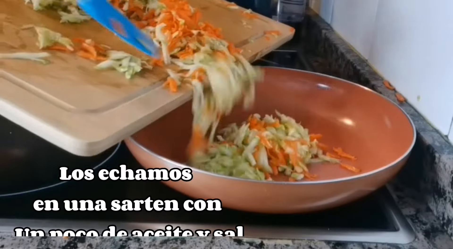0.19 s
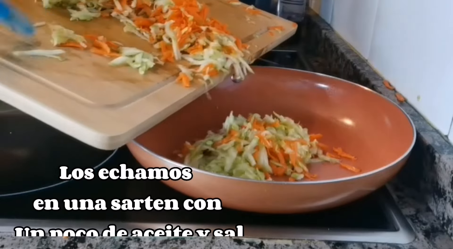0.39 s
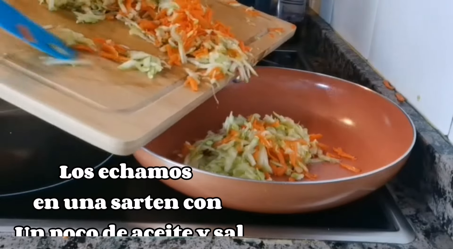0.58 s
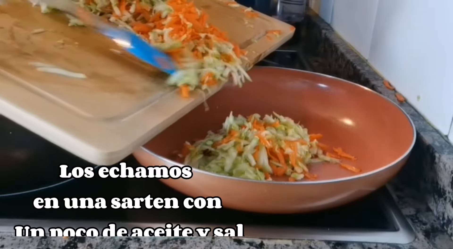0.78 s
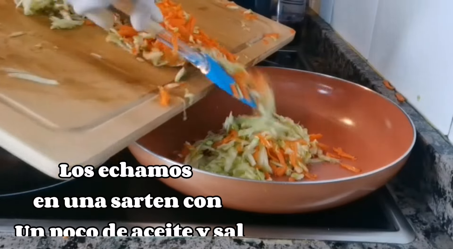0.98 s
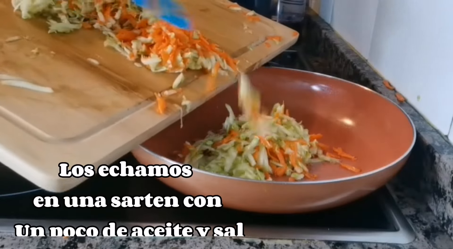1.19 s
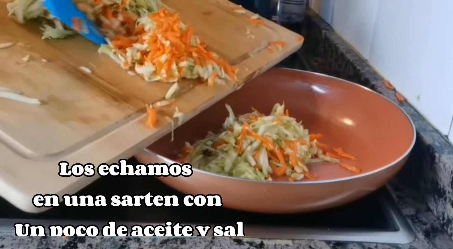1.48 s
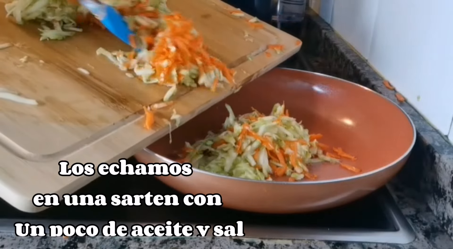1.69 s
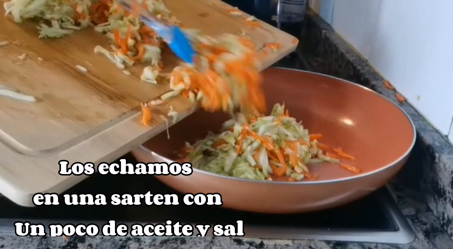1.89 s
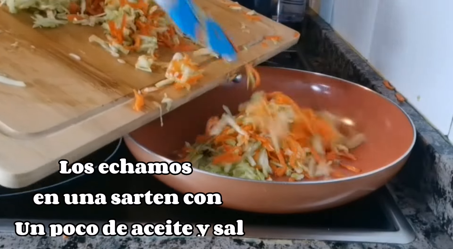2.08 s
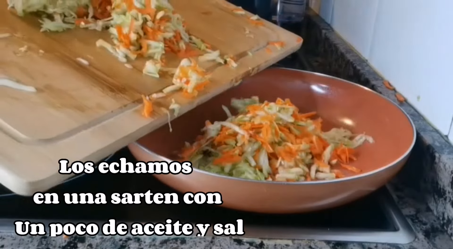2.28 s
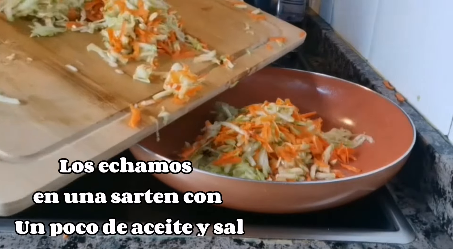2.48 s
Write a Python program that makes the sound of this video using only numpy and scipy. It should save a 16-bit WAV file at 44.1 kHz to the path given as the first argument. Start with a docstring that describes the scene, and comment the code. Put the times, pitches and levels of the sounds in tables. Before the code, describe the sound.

A hard clack dominates at 0.25 s, after faint wet scraping, ticks and dull bumps: a bright crack, rattling ring and swelling low boom, dying within half a second. Gritty, hissing scrapes of shreds on wood peak around 0.8 s, with a tick near 0.9. From 1.58 to 1.65 s woody bumps and dry raps cluster; lighter knocks, a click at 1.9, scrapes and soft taps follow. Low mains hum, close kitchen echoes.

```python
"""A silicone spatula pushes shredded vegetables off a wooden board into a frying pan.
First a wet scrape (grainy noise), dull bumps of the board (ringing modes) and ticks of shreds (short noise).
Then one hard clack rings through the kitchen: bright noise, with ringing tones that swell under it.
After it come more scraping strokes, ticks and taps, and a run of board bumps and dry raps.
A low mains hum of a few wavering sines and faint room air last throughout."""
import sys
import numpy as np
from scipy import signal
from scipy.fft import rfft, irfft
from scipy.io import wavfile
from scipy.ndimage import uniform_filter1d

SR = 44100
rng = np.random.default_rng(int(sys.argv[2]) if len(sys.argv) > 2 else 0)


def put_to_file(sound):
    """Save the sound as 16-bit audio at rate SR, in the file named by the first command-line argument."""
    columns = np.atleast_2d(sound).T  # one column per channel
    safe = np.clip(columns, -1, 1)
    whole_steps = np.round(safe * 32767)
    wavfile.write(sys.argv[1], SR, whole_steps.astype(np.int16))


N = 114660
T = np.arange(N) / SR  # time of each sample, s
FREQS = np.arange(N // 2 + 1) * SR / N  # frequency of each spectrum line, Hz
ROOM_T60_S = 0.37  # time for the kitchen's tail to fall by 60 dB


def amp(db):
    """Turn decibels into a gain."""
    return 10 ** (np.asarray(db) / 20)


def pan(db):
    """Left and right gains for a level difference; above zero leans left."""
    return amp(np.array([[db], [-db]]) / 2)


def shape(x, points):
    """Filter a sound by a curve of (f/Hz, gain/dB) points."""
    hz, db = np.array(points, float).T
    curve_db = np.interp(np.log(FREQS + 1), np.log(hz), db)
    return irfft(rfft(x) * amp(curve_db), N)


def colour(x, points):
    """Give a sound a spectrum, then scale it to a standard deviation of 1."""
    y = shape(x, points)
    return y / y.std()


def noise():
    """Stereo noise: more alike on both sides in the bass, unrelated at the top."""
    mid, side = rng.standard_normal((2, N))
    side = shape(side, [(130, -6), (400, 1.0), (1200, 0)])
    return mid + side * np.array([[1], [-1]])


def walk(rate):
    """Random wander with a spread near 1: `rate` new values a second, joined smoothly."""
    k = int(SR / rate)
    steps = np.repeat(rng.standard_normal(N // k + 1), k)
    return uniform_filter1d(steps, k)[:N]


def fade(t, t60):
    """Exponential decay from time zero, falling 60 dB in t60 seconds."""
    return (t >= 0) * np.exp(-np.log(1000) * np.maximum(t, 0) / t60)


def swell(t, rise, hold, t60):
    """Soft attack, hold and a rounded turn into the decay."""
    attack = (1 - np.exp(-np.maximum(t, 0) / rise)) ** 2
    exponent = np.minimum(2 * np.log(1000) * (t - hold) / t60, 100)  # limit avoids overflow
    return attack / np.sqrt(1 + np.exp(exponent))


def burst(t, t60, room_db):
    """A short decay followed by the kitchen's longer, weaker tail."""
    return np.hypot(fade(t, t60), amp(room_db) * fade(t, ROOM_T60_S))


def hits(rows, t60, room_db):
    """Joint loudness curve of a table of (t/s, level/dB) hits, added as powers."""
    return np.sqrt(sum((amp(db) * burst(T - s, t60, room_db)) ** 2 for s, db in rows))


def strike(t, modes):
    """Modes set ringing by one blow, a little different in level and pitch each time."""
    out = 0
    for hz, db, t60 in modes:
        level_change, pitch_change = rng.standard_normal(2)
        tone = -np.sin(2 * np.pi * hz * (1 + 0.0056 * pitch_change) * t)
        out = out + amp(db + level_change) * fade(t, t60) * tone
    return out


def clack_crack(t):
    """The bright start of the hard blow: a slap just ahead, a crack and a very short snap, all of noise."""
    # spectra: f/Hz, level/dB
    crack_spectrum = [(200, -14.5), (450, 9), (800, 1.5), (1350, 4), (2000, -3.5), (3600, -16),
                      (5500, -11.5), (7300, -26.5), (8400, -3), (9200, 5.5), (10300, -7.5), (12000, -19),
                      (15500, -21.5)]
    snap_spectrum = [(3000, -27), (7400, -24.5), (8400, -2), (9100, 10), (10000, -6.5), (12000, -25.5)]
    rise_s, t60_s, slap_lead_s = 0.0046, 0.049, 0.006
    envelope = np.where(t < 0, np.exp(-np.abs(t) / rise_s), fade(t, t60_s))
    crack = amp(-19.5) * envelope * colour(noise(), crack_spectrum) * pan(-3.5)
    slap = amp(-25.5) * fade(t + slap_lead_s, t60_s) * colour(noise(), crack_spectrum)
    snap = amp(-19) * fade(t, 0.012) * colour(noise(), snap_spectrum) * pan(-9.5)
    return crack + slap + snap


def clack_ring(t):
    """The dense rattling ring: flickering noise whose bands each swell, hold and die away in their own time."""
    # spectrum: f/Hz, level/dB
    ring_spectrum = [(60, -25.5), (150, 1.5), (270, -10.5), (350, -6), (700, 3.5), (850, -5), (1050, 2.5),
                     (1500, -7), (2600, -17.5), (3700, -30.5), (5500, -21), (7400, -31.5), (9200, -9),
                     (11500, -23), (15500, -24.5)]
    # bands: centre f/Hz, rise/s, hold/s, t60/s, left-right difference/dB
    ring_bands = [(382, .002, 0.06, 0.44, -8), (980, 0.01, 0.1, 0.42, 1), (2400, .014, 0.12, 0.41, 0.5),
                  (5500, .01, 0.12, 0.34, 3), (9300, .003, 0.09, 0.32, 2), (14000, .002, 0.025, 0.28, -5)]
    rattle_per_s, rattle_db = 170, 2.5
    rattling = noise() * amp(rattle_db * walk(rattle_per_s))
    spectrum = rfft(colour(rattling, ring_spectrum))
    centres = np.log([band[0] for band in ring_bands])
    out = np.zeros((2, N))
    for share, (_, rise, hold, t60, pan_db) in zip(np.eye(len(centres)), ring_bands):
        weight = np.interp(np.log(FREQS + 1), centres, share)  # neighbouring bands cross-fade
        band = irfft(spectrum * weight, N)
        out += amp(-27.5) * band * swell(t, rise, hold, t60) * pan(pan_db)
    return out


def clack_modes(t):
    """Ringing tones after the blow, with a low boom that swells in under them: sines that swell, hold, then are
    damped."""
    # ringing modes: f/Hz, level/dB, rise/s, hold/s, t60/s, left-right difference/dB
    ring_modes = [(133.6, -17.5, .027, 0.093, 0.5, 2), (426, -45, 0.0092, 0.064, 0.44, -6),
                  (466.3, -33, 0.0095, 0.11, 0.39, -9.5), (570, -40.5, .012, .05, .3, -2),
                  (721.2, -30.5, .006, .05, 0.52, -4), (743, -41.5, 0.0073, 0.092, 0.5, 3.5),
                  (966, -35, .02, 0.11, .3, -1.5), (1043, -37.5, .02, .11, 0.33, 4.5),
                  (344, -41, .02, .042, 0.27, -3), (1875, -44, .012, 0.099, 0.38, 3.5)]
    damp_s, damp_t60_s = .28, .4  # extra damping sets in this long after the blow
    damping = np.hypot(1, np.exp(np.minimum(np.log(1000) * (t - damp_s) / damp_t60_s, 20)))
    out = np.zeros((2, N))
    for hz, db, rise, hold, t60, pan_db in ring_modes:
        # the two sides may drift further apart in phase at higher pitch
        side_shift = min(hz / 3000, 1) * np.array([[0], [rng.uniform(-0.62, 1)]])
        phase = 2 * np.pi * (rng.random() + side_shift)
        tone = np.sin(2 * np.pi * hz * t + phase)
        out += amp(db) * swell(t, rise, hold, t60) / damping * tone * pan(pan_db)
    return out


def clack():
    """One hard blow sets off a crack, a rattling ring and slower ringing modes."""
    t = T - .2485  # time since the blow, s
    return clack_crack(t) + clack_ring(t) + clack_modes(t)


def board():
    """Each bump rocks the hand-held board, rings its wood and clicks at the contact."""
    # bumps: t/s, low thud level/dB, woody knock level/dB, click level/dB, pitch of the wood/ratio
    bumps = [(.007, -49.5, -57, -60, 1.06), (0.128, -44, -59.5, -60, 0.99), (1.579, -30, -33.5, -52, 1),
             (1.597, -56, -41.5, -53, 1.1), (1.621, -38, -44.5, -55, 1), (1.644, -30.5, -43.5, -68, 1),
             (1.735, -41, -54.5, -83, .97), (1.823, -42.5, -48.5, -71, 1.02),
             (1.908, -35, -41.5, -56, 1.035), (1.916, -48.5, -43.5, -34, 0.92), (1.962, -41, -61, -68, .96),
             (2.089, -49, -76, -90, 0.79)]
    # board modes: f/Hz, level/dB, t60/s
    low_modes = [(56.26, 2.5, 0.45), (100.4, 6.5, 0.14), (180.1, -8, 0.4)]
    high_modes = [(345.2, -8.5, 0.15), (480.1, -5.5, 0.28), (705.8, -14.5, 0.23), (1003, -12, 0.25),
                  (1484, -13, 0.19), (1937, -21, 0.12), (2400, -27, 0.12)]
    # spectra: f/Hz, level/dB
    wood_spectrum = [(90, 3), (220, 1.5), (480, 3.5), (750, -5), (1050, -3.5), (1600, -10), (2500, -20.5),
                     (8000, -44.5)]
    click_spectrum = [(500, -13.5), (1500, -2), (2400, 6), (3600, -10.5), (5400, 3.5), (7400, -16.5),
                      (9300, 4), (11500, -12.5), (15500, -14)]
    thud_rise_s = .00002  # for a 0 dB thud; gentler bumps push for longer
    wood_db = -2  # noise of the wood against its modes
    tones, wood_power, click_power = np.zeros((3, N))
    for s, thud_db, knock_db, click_db, pitch in bumps:
        start = int(s * SR)
        i = slice(max(start, 0), start + SR // 2)
        t = T[i] - s
        push = 1 - np.exp(-np.abs(t) * amp(thud_db) / thud_rise_s)
        tones[i] += amp(thud_db) * push * strike(t, low_modes)
        tones[i] += amp(knock_db) * strike(t * pitch, high_modes)
        wood_power[i] += (amp(knock_db + wood_db) * burst(t, 0.059, -5.5)) ** 2
        click_power[i] += (amp(click_db) * burst(t, 0.043, -20)) ** 2
    wood = np.sqrt(wood_power) * colour(noise(), wood_spectrum)
    click = np.sqrt(click_power) * colour(noise(), click_spectrum) * pan(4)
    return tones + wood + click


def raps():
    """The board rattles in dry raps: short bursts of mid-range noise."""
    # raps: t/s, level/dB
    rap_hits = [(1.582, -38), (1.598, -39.5), (1.625, -48.5), (1.668, -57)]
    # spectrum: f/Hz, level/dB
    rap_spectrum = [(600, -7), (1400, 4.5), (2600, -2.5), (3500, -15), (5500, -11.5), (7500, -47)]
    return hits(rap_hits, 0.035, -15.5) * colour(noise(), rap_spectrum)


def scraping():
    """Countless tiny slips of wet shreds hiss and rub the wood; hard strokes add a broad, stuttering spray."""
    # strokes: t/s, wet hiss level/dB, rub on the wood level/dB
    strokes = [(0, -62.5, -108), (0.141, -67.5, -70.5), (0.211, -77, -75.5), (.57, -80.5, -77.5),
               (.65, -59.5, -64), (.72, -55.5, -63), (0.811, -50.5, -64), (0.912, -55, -62),
               (.97, -66, -65), (1.04, -72, -76), (1.2, -88.5, -90), (1.41, -93, -93.5),
               (1.459, -84.5, -73.5), (1.53, -72, -64.5), (1.60, -61.5, -68), (1.71, -69, -79),
               (1.84, -61, -72.5), (1.95, -58.5, -67), (2.07, -74, -90), (2.159, -64.5, -74),
               (2.28, -86.5, -94), (2.48, -93.5, -101), (2.6, -73, -78.5)]
    # spectra: f/Hz, level/dB
    hiss_spectrum = [(2000, -26), (3800, -13), (5500, -3), (6600, -12), (7600, -30.5), (8500, -2.5),
                     (9300, 5), (11000, -8), (13000, -13.5), (15500, -7)]
    rub_spectrum = [(250, -13.5), (700, -11.5), (880, -17.5), (1060, 1), (1250, -8), (1530, 6.5),
                    (1800, -6), (2100, -7.5), (2550, -2.5), (3000, -5), (3400, -18.5), (6000, -33)]
    spray_spectrum = [(1500, -8.5), (5000, 0), (7600, -9.5), (9800, 4), (14000, 0)]
    slips_per_s, slip_spread_db = 5000, 2.2
    s, hiss_points, rub_points = np.array(strokes).T
    hiss_db = np.interp(T, s, hiss_points)
    rub_db = np.interp(T, s, rub_points)

    slip_size = amp(slip_spread_db * np.minimum(rng.exponential(size=N), 5))
    slips = (rng.random(N) < slips_per_s / SR) * slip_size
    grain = slips * rng.standard_normal((2, N))
    grain = grain / grain.std() + 0.86 * noise()
    hiss = colour(grain, hiss_spectrum) * amp(hiss_db + 1.6 * walk(45)) * pan(4)
    rub = colour(grain, rub_spectrum) * amp(rub_db + 1.8 * walk(39)) * pan(2)

    # the spray grows faster than the hiss: 1.4 dB for each dB
    hard_stroke_db, spray_slope, stutter_db, stutter_per_s = -50.5, 1.4, 2.5, 110
    spray_db = -56.5 + spray_slope * (hiss_db - hard_stroke_db)
    stutter = stutter_db * walk(stutter_per_s)
    spray = colour(noise(), spray_spectrum) * amp(spray_db + stutter) * pan(4)
    return hiss + rub + spray


def shreds():
    """Shreds snap or land in moist ticks, and soft clumps tap the pan: short bursts of noise."""
    # hits: t/s, level/dB
    tick_hits = [(.014, -48), (.048, -51.5), (.073, -49), (.132, -45), (.649, -49), (.889, -39.5),
                 (1.553, -59), (1.75, -55.5), (1.784, -54.5), (1.948, -52), (2.022, -54), (2.151, -58),
                 (2.167, -52.5)]
    tap_hits = [(.008, -51.5), (.135, -56.5), (.169, -58), (1.120, -61), (1.197, -68.5), (2.111, -54),
                (2.145, -58), (2.168, -60.5), (2.273, -65)]
    # spectra: f/Hz, level/dB
    tick_spectrum = [(1500, -21.5), (3500, -22), (5400, -6), (7400, -20), (9400, 7), (11500, -6.5),
                     (15500, -13)]
    tap_spectrum = [(700, -6.5), (960, 5), (1150, -0.5), (1350, -10), (1580, -1.5), (1850, -20),
                    (4000, -37)]
    ticks = hits(tick_hits, 0.032, -15.5) * colour(noise(), tick_spectrum) * pan(5.5)
    taps = hits(tap_hits, 0.062, -15.5) * colour(noise(), tap_spectrum)
    return ticks + taps


def nearby(x):
    """Worktop, pan and tiles close by add four early echoes that comb the sound."""
    # echo filter: f/Hz, gain/dB
    echo_curve = [(500, -22), (1100, -2.5), (1700, 0), (4500, -2.5), (9000, -7)]
    lags_s = rng.uniform(0.001213, .011, size=4)
    echo = amp(-12.5) * shape(x, echo_curve)
    return x + sum(np.pad(echo, ((0, 0), (int(s * SR), 0)))[:, :N] for s in lags_s)


def lean_left(x):
    """Lean the treble left, from nothing at 10 kHz to the full difference at 12.5 kHz."""
    difference_db = 5.5
    left = shape(x[0], [(10000, 0), (12500, difference_db / 2)])
    right = shape(x[1], [(10000, 0), (12500, -difference_db / 2)])
    return np.array([left, right])


def kitchen():
    """An appliance hum of sines that waver in level and pitch, over faint room air made of noise."""
    # hum: f/Hz, level/dB
    hum_tones = [(49.6, -60.5), (99.3, -54), (148.8, -68), (642, -83), (691, -86.5)]
    # spectrum: f/Hz, level/dB
    air_spectrum = [(25, -11.5), (50, 6), (170, -3.5), (260, -17), (650, -19.5), (3000, -41.5),
                    (15500, -39.5)]
    waver_db, pitch_drift = .6, .006  # drift as a share of the pitch
    hum = np.zeros(N)
    for hz, db in hum_tones:
        cycles = rng.random() + hz * np.cumsum(1 + pitch_drift * walk(3.8)) / SR
        hum += amp(db + waver_db * walk(6.8)) * np.sin(2 * np.pi * cycles)
    air = amp(-67) * colour(noise(), air_spectrum) * pan(-2)
    return hum * pan(1.2) + air


def scene():
    """Work at the board, with its close echoes and left-leaning treble, in the humming kitchen."""
    work = nearby(clack() + board() + raps() + scraping() + shreds())
    return lean_left(work) + kitchen()


def record(dry):
    """The recorder thins the deepest bass and cuts the top."""
    low_cut_hz, top_hz = 43, 15900
    bass_cut = signal.butter(5, low_cut_hz, "high", fs=SR, output="sos")
    top_cut = signal.ellip(10, .2, 80, top_hz, fs=SR, output="sos")
    return signal.sosfilt(top_cut, signal.sosfilt(bass_cut, dry))


dry = scene()
out = record(dry)
put_to_file(out)
```